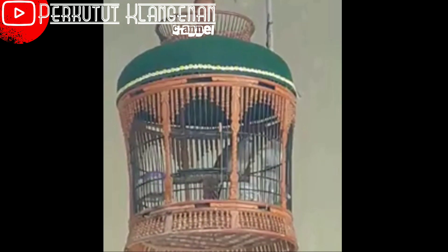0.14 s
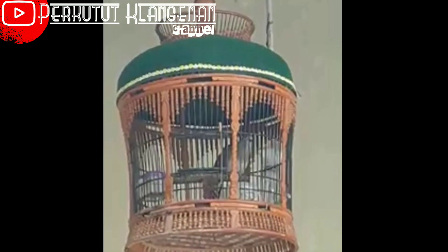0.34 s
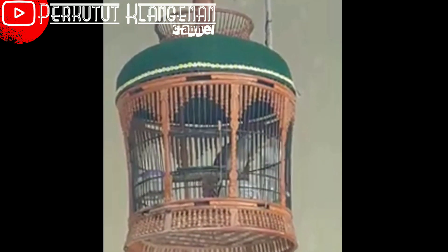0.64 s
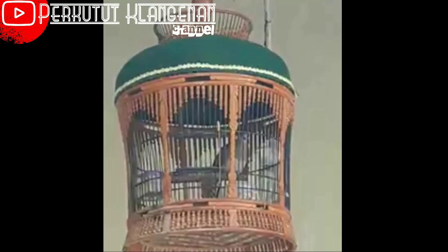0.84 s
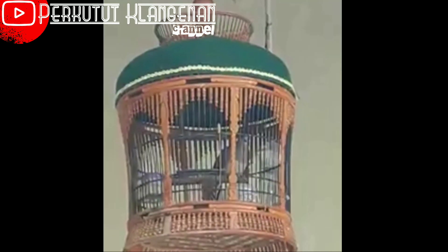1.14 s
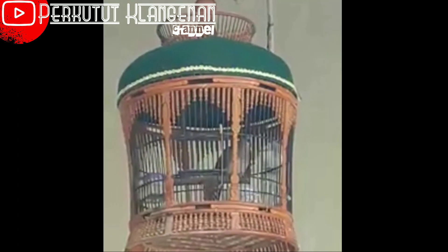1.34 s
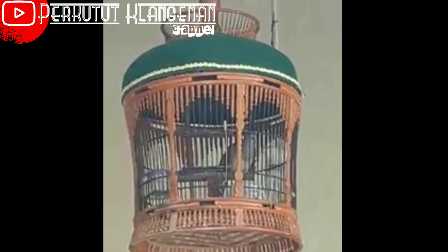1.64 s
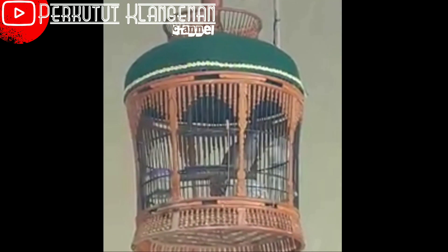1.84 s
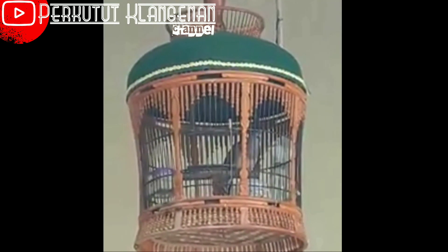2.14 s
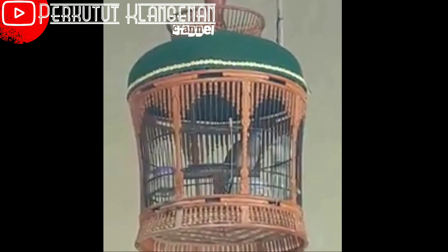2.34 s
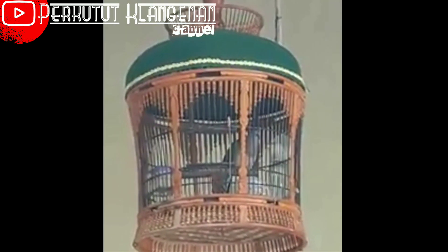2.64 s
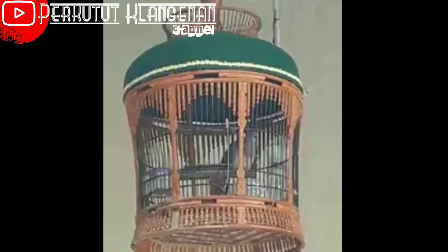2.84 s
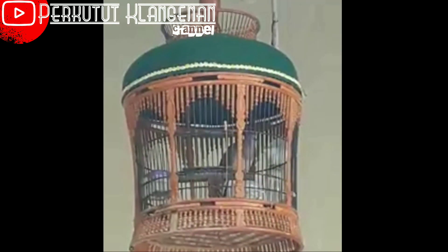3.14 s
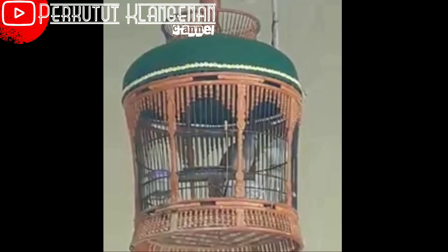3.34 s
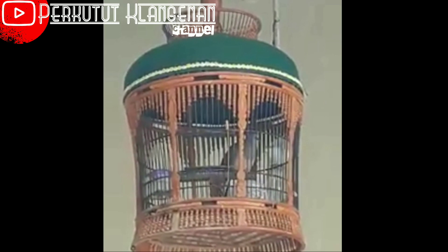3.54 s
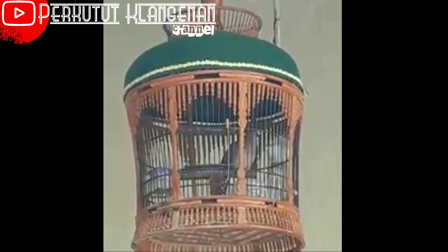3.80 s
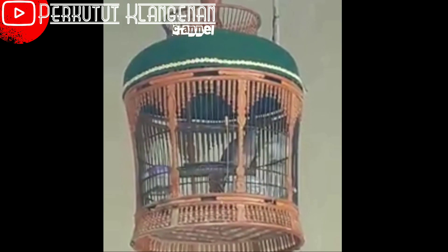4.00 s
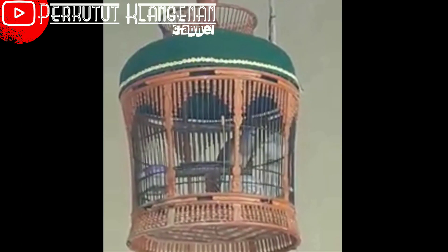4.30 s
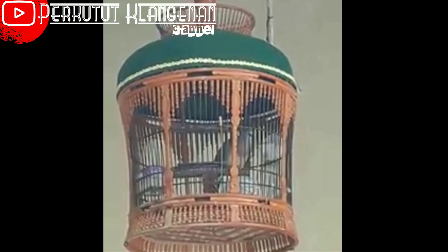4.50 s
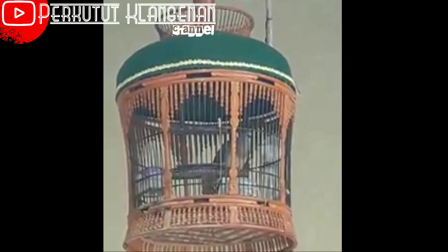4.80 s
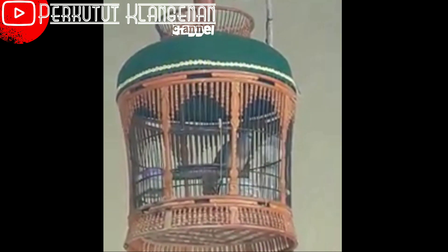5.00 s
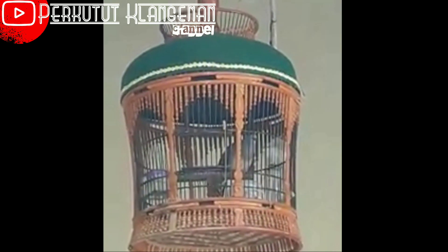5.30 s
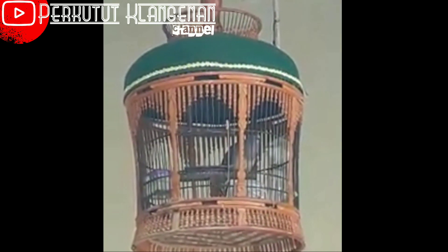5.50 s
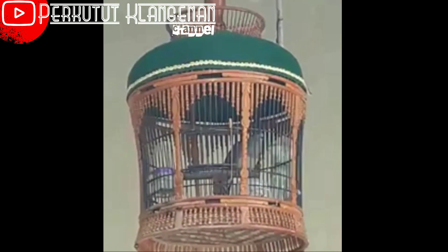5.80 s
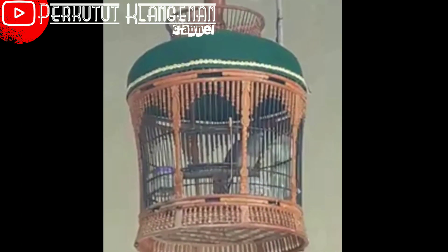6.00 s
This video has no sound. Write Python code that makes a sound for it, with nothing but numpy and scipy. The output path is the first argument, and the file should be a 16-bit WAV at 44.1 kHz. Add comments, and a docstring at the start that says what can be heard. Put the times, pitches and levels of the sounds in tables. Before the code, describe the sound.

In a hard-walled, echoing yard, a quick chirpy whistle sounds close on the right as an earlier coo's echo dies. A nearby caged dove then gives two loud, fluty, throaty coos several seconds apart, overloading the microphone. Faint doves answer far off, soft broom-like swishes come and go over low hum and rumble, and a hoarse fowl calls twice at the end.

```python
"""In a hard-walled yard a caged dove coos loudly; the recorder's input clips on the peaks.
A small bird whistles close to the right microphone, far doves answer, a hoarse fowl calls at the end.
Doves and whistler are gliding sines, the fowl is pulsed noise through a throat; all four get the yard's echo.
A broom-like swish of filtered noise comes and goes over mains hum, distant rumble and low air noise."""
import sys
import numpy as np
from scipy import signal
from scipy.fft import rfft, irfft, next_fast_len
from scipy.io import wavfile
from scipy.ndimage import uniform_filter1d, map_coordinates

SR = 44100
rng = np.random.default_rng(int(sys.argv[2]) if len(sys.argv) > 2 else 0)


def unload_wav(signal):
    """Save mono or channel-first audio to the path in sys.argv[1] as 16-bit WAV at rate SR, clipped to [-1, 1]."""
    wavfile.write(
        sys.argv[1],
        SR,
        np.round(np.clip(np.atleast_2d(signal).T, -1, 1) * 32767).astype(np.int16),
    )


N = 271330
LEAD = SR  # samples made before the start, so that their echo is already there


def amp(db):
    """Decibels to amplitude ratio."""
    return 10 ** (np.asarray(db) / 20)


def unit(x):
    """Scales to rms 1."""
    return x / np.sqrt(np.mean(x ** 2) + 1e-20)


def along(points, hz):
    """Reads (Hz, value) points on a log frequency axis."""
    f, v = np.transpose(points)
    return np.interp(np.log(hz + 1), np.log(f + 1), v)


def curves(rows, t):
    """Each column after the time, read at the times t."""
    s, *cols = np.transpose(rows)
    return [np.interp(t, s, c) for c in cols]


def wobble(knots_per_s, size=N):
    """A smooth random curve through normal knots."""
    knots = rng.standard_normal(int(size * knots_per_s / SR) + 4)
    return map_coordinates(knots, [np.arange(size) * knots_per_s / SR])


def filtered(x, response):
    """x times a complex response of frequency."""
    m = next_fast_len(x.shape[-1] + SR // 2)
    spectrum = rfft(x, m) * response(np.fft.rfftfreq(m, 1 / SR))
    return irfft(spectrum, m)[..., :x.shape[-1]]


def tone(hz):
    """A sine of rms 1 on a pitch curve."""
    return np.sqrt(2) * np.sin(2 * np.pi * np.cumsum(hz) / SR)


def add(track, s, sound):
    """Mixes a sound into a track that begins LEAD samples early."""
    part = track[LEAD + round(s * SR):][:len(sound)]
    part += sound[:len(part)]


# Left-right likeness of noise. Each row: frequency in Hz, correlation from -1 to 1.
LIKENESS = [(60, 1), (150, 0.95), (380, 0.7), (950, 0.1), (2370, -0.0019), (5940, -0.036), (14900, 0.15)]
# Stereo tilt of noise. Each row: frequency in Hz, left minus right in dB.
TILT = [(60, 2), (180, -2), (540, 0.5), (1640, -3), (4950, -5.5), (14900, 2)]


def rush(spectrum, patchy_db):
    """Stereo noise of rms 1: random gain patches in time and frequency, then colour, likeness and tilt."""
    z = signal.stft(rng.standard_normal((2, N)), nperseg=512)[2]
    patches = uniform_filter1d(rng.standard_normal(z.shape[1:]), 6, 0)  # across frequency
    patches = uniform_filter1d(patches, 10, 1)  # across time
    pair = signal.istft(z * amp(patchy_db * unit(patches)), nperseg=512)[1][:, :N]

    def mid_side_gain(hz):
        angle = np.arccos(np.clip(along(LIKENESS, hz), -1, 1)) / 2
        return amp(along(spectrum, hz)) * [np.cos(angle), np.sin(angle)]

    def tilt_gain(hz):
        return amp(np.outer([.5, -.5], along(TILT, hz)))

    mid, side = filtered(pair, mid_side_gain)
    return unit(filtered(np.array([mid + side, mid - side]), tilt_gain))


# Rumble level, before its small wobble. Each row: time in s, level in dB.
RUMBLE_LEVEL = [(0, -53.5), (.6, -49.5), (1.6, -46.5), (2.4, -40.5), (3.4, -43.5), (4.1, -40.5), (5.5, -44),
                (6.15, -42)]


def rumble_level():
    """Rumble level in dB against time; hum and air follow its swings in part."""
    return curves(RUMBLE_LEVEL, np.arange(N) / SR)[0]


# Rumble colour. Each row: frequency in Hz, relative density in dB per Hz.
RUMBLE_COLOUR = [(15, -38.5), (25, -29), (38, -37.5), (89, 1.5), (151, -3), (266, -9.5), (300, -8.5),
                 (430, -12.5), (537, -12), (1500, -13), (1950, -66), (3300, -120)]


def distant_rumble(level_db):
    """Low patchy noise, strongest near 90 Hz, whose level drifts."""
    return amp(level_db + 0.8 * wobble(3)) * rush(RUMBLE_COLOUR, patchy_db=2.0)


# Mains lines. Each row: centre frequency in Hz, nominal level in dB.
MAINS_LINES = [(100, -54), (150, -53.5), (200, -60.5), (300, -51.5), (400, -59.5)]


def mains_hum(swing_db):
    """Mains harmonics as sines, slightly unsteady in level and pitch."""
    hum = np.zeros(N)
    for hz, db in MAINS_LINES:
        level_db = db + 2.1 * wobble(4.9) + 0.96 * swing_db
        hum += amp(level_db) * tone(hz + 1.5 * wobble(10))
    return hum


def port_air(swing_db):
    """Air on the microphone ports: noise falling steeply above 35 Hz, independent left and right."""
    noise = filtered(rng.standard_normal((2, N)), lambda hz: 1 / (1 + (hz / 35) ** 3))
    return amp(-59 + .6 * swing_db) * unit(noise)


def stroke(t, hold_s):
    """Gain of one sweep: quick rise, hold, fade."""
    rise_s, fall_db_per_s = 0.045, 63
    fade_db = -fall_db_per_s * np.clip(t - rise_s - hold_s, 0, None)
    return np.clip(t / rise_s, 0, 1) ** 2 * amp(fade_db)


# Strokes. Each row: body start in s, hiss lead in s, body hold in s, relative body dB, relative hiss dB.
STROKES = [(1.19, .08, 0.097, -40.5, -63.5), (2.425, .03, 0.094, -56, -56.5),
           (3.655, 0.04, 0.21, -46.5, -67), (4.987, .02, 0.059, -44, -60)]
# Continuous noise under the strokes, rising and falling, at times as loud as they are.
# Each row: time in s, relative body level in dB, relative hiss level in dB.
STEADY_WASH = [(0, -49.5, -63), (1.05, -58.5, -68.5), (1.6, -65, -69), (1.85, -48.5, -60.5),
               (2.3, -48.5, -63.5), (3, -55, -66.5), (3.6, -51, -63), (4.3, -45.5, -56), (4.9, -49, -63.5),
               (5.6, -55.5, -66), (6.15, -47, -59.5)]
# Body colour. Each row: frequency in Hz, relative density in dB per Hz.
BODY_COLOUR = [(700, -48), (1200, -17), (1700, 2.5), (2800, 0.5), (3500, -11), (4700, -7), (7000, -51),
               (10000, -52.5)]
# Hiss colour. Each row: frequency in Hz, relative density in dB per Hz.
HISS_COLOUR = [(2500, -5), (4000, -1), (6000, -2), (8200, -6), (10000, -6.5), (13000, -5.5), (15500, -9.5)]


def swish():
    """Broom-like strokes on a continuous wash of like noise; each stroke's hiss leads its body a little."""
    t = np.arange(N) / SR
    body_db, hiss_db = curves(STEADY_WASH, t)
    body_gain, hiss_gain = amp(body_db), amp(hiss_db)
    for s, lead_s, hold_s, stroke_body_db, stroke_hiss_db in STROKES:
        body_gain += amp(stroke_body_db) * stroke(t - s, hold_s)
        hiss_gain += amp(stroke_hiss_db) * stroke(t - s + lead_s, hold_s + lead_s)
    body = body_gain * amp(4.5 + 0.89 * wobble(14)) * rush(BODY_COLOUR, patchy_db=2.5)
    hiss = hiss_gain * amp(14 + .8 * wobble(9)) * rush(HISS_COLOUR, patchy_db=3.5)
    return body + hiss


def background():
    """Sum of swish, rumble, hum and air; no yard echo is added."""
    level_db = rumble_level()
    swing_db = level_db - level_db.mean()
    return swish() + distant_rumble(level_db) + mains_hum(swing_db) + port_air(swing_db)


# Echo decay before evening and the ageing fade. Each row: frequency in Hz, t60 in s.
YARD_T60 = [(500, 0.32), (1000, 0.63), (2500, 0.86), (6000, 0.54)]


def yard(x, direct_db, rise_s, left_lag_s):
    """Direct sound, later on the left, plus a noise echo that builds up and dies at a speed set by pitch."""
    hz, t, z = signal.stft(rng.standard_normal((2, LEAD)), SR, nperseg=256)
    decay = amp(-60 * t / along(YARD_T60, hz)[:, None])
    tail = signal.istft(z * decay, SR, nperseg=256)[1][:, :LEAD]
    spectrum = rfft(tail, 2 * LEAD)
    # evens out the noise tail's spectrum, so that steady tones keep a more equal echo level
    tail = irfft(spectrum / np.sqrt(np.abs(spectrum)))[:, :LEAD]
    age_s = np.arange(LEAD) / SR
    ageing_fade = amp(-20 * age_s ** 2)  # the echo dies faster and faster as it ages
    tail = tail * (1 - np.exp(-age_s / rise_s)) * ageing_fade
    tail = tail / np.linalg.norm(tail, axis=1, keepdims=True)
    direct = amp(direct_db)[:, None] * [np.roll(x, round(left_lag_s * SR)), x]
    echo = signal.fftconvolve(x[None], tail, axes=1)[:, :len(x)]
    return (echo + direct)[:, LEAD:]


# Far notes. Each row: start in s, length in s, nominal first Hz, nominal last Hz, relative level in dB,
# burr as pitch scatter share.
FAR_NOTES = [(0.361, 0.093, 734, 727, -46, 0.0323), (0.935, 0.082, 740, 763, -52, 0.05),
             (1.413, 0.23, 818, 794, -52, 0.043), (2.672, 0.075, 855, 732, -43.5, 0.054),
             (2.919, 0.066, 916, 810, -48, .07), (3.221, 0.125, 780, 712, -46.5, 0.057),
             (3.422, 0.32, 945, 925, -49.5, 0.018), (3.451, 0.46, 811, 860, -50.5, 0.048),
             (3.776, 0.28, 948, 885, -48, 0.0064), (4.062, 0.074, 926, 866, -44.5, 0.018),
             (5.045, 0.128, 669, 732, -48.5, 0.041), (5.192, 0.061, 879, 714, -34, 0.039),
             (5.879, 0.0844, 962, 1034, -20.5, 0.017), (6.138, 0.051, 990, 928, -22.5, 0.012)]


def far_doves():
    """Short burry sines that start abruptly, slightly flat, and throb with the burr."""
    track = np.zeros(LEAD + N)
    for s, length_s, first_hz, last_hz, db, burr in FAR_NOTES:
        t = np.arange(round(length_s * SR)) / SR
        glide_hz = first_hz + (last_hz - first_hz) * t / length_s
        hz = glide_hz * (1 - 0.04 * np.exp(-t / 0.019))
        swell = np.clip(np.minimum(t / 0.0013, (length_s - t) / 0.024), 0, 1)
        throb = 1 + 12 * burr * np.sin(2 * np.pi * 60 * t)
        scatter = 1 + burr * wobble(91.1, size=len(t))
        add(track, s, amp(db) * swell * throb * tone(hz * scatter))
    return track


# Throat resonances, passed twice. Each row: centre in Hz, width in Hz, relative level per pass in dB.
THROAT = [(730, 430, -4), (1120, 300, -0.5), (1550, 200, 2), (2111.7, 670, -7), (2930, 800, -10.5)]
# Fowl calls. Each row: time of full strength in s, hold in s, relative level in dB.
FOWL_CALLS = [(5.828, 0.057, -24.5), (6.133, .03, -20)]


def fowl():
    """Breathy noise gated by uneven slow pulses, through the throat; each call swells fast and fades."""
    rise_db_per_s, fall_db_per_s = 394, 194
    t = np.arange(-LEAD, N) / SR
    pulse_hz = 65 + 12 * wobble(20, size=len(t))
    gate = (1 + 0.16 * np.sin(2 * np.pi * np.cumsum(pulse_hz) / SR)) ** 2

    def throat(f):
        total = 0
        for k, (centre, width, db) in enumerate(THROAT):
            band = 1j * f * width / (centre * centre - f * f + 1j * f * width + 1)
            total = total + (-1) ** k * amp(db) * band  # alternate signs
        return total

    voice = unit(filtered(gate * rng.standard_normal(len(t)), lambda f: throat(f) ** 2))
    gain = np.zeros(len(t))
    for s, hold_s, db in FOWL_CALLS:
        slope_db = np.minimum(rise_db_per_s * (t - s), fall_db_per_s * (s + hold_s - t))
        gain += amp(db + np.minimum(0, slope_db))
    return voice * gain


# Three notes: an arch, a rise with a final drop, a fall. Each row: time in s, pitch in Hz, relative dB.
WHISTLE_NOTES = [
    [(.022, 1950, -36), (.033, 2650, -11), (.046, 3170, -11), (.056, 2904, -9.5), (.062, 2130, -11),
     (.068, 1990, -27)],
    [(.083, 2690, -28), (.094, 2632, -12), (.115, 2570, -6), (.164, 3070, -11), (.177, 3236, -21),
     (.19, 2630, -21)],
    [(.195, 2680, -23.5), (.203, 2680, -12.5), (.226, 2570, -5.5), (.242, 2212, -13.5), (.246, 1990, -28)],
]
# Level roughness of each note, 0-1.
NOTE_RASP = [0.13, 0.014, .02]
# Echoes near the whistler. Each row: delay in s, level against the notes in dB.
WALL_ECHOES = [(.0045, -25), (.009, -18), (0.013, -13.5), (0.018, -20.5), (0.024, -20.5)]


def whistler():
    """Gliding sines, the first one raspy, with quick echoes off nearby walls."""
    glide_s = 0.0042  # rounds the corners of the pitch
    track = np.zeros(LEAD + N)
    for note, rasp in zip(WHISTLE_NOTES, NOTE_RASP):
        t = np.arange(note[0][0], note[-1][0], 1 / SR)
        hz, db = curves(note, t)
        hz = uniform_filter1d(hz, round(glide_s * SR), mode='nearest')
        edge = np.clip(np.minimum(t - t[0], t[-1] - t) / 0.0011, 0, 1)
        roughness = 1 + rasp * wobble(2500, size=len(t))
        add(track, t[0], amp(db) * edge * roughness * tone(hz))
    echoes = sum(amp(db) * np.roll(track, round(s * SR)) for s, db in WALL_ECHOES)
    return track + echoes


# One coo: scoop up, held top, sag, second lift and sag. Each row: s after its start, nominal pitch in Hz,
# relative level in dB, depth of the throat roll 0-1.
COO_SHAPE = [(0, 864, -46.5, .1), (.022, 895.3, -4.5, 0), (.048, 1125, -1, 0.39), (.15, 1131, -2, 0.32),
             (.25, 1008, -5, 0.07), (.4, 981.8, -6, 1), (.435, 1095, -1.5, 0.56), (.565, 986.6, -9.5, 1),
             (.59, 926, -51, 0.4)]
# Coos. Each row: start in s, relative level in dB, puff level within the coo in dB.
COO_STARTS = [(-.565, -6, -22), (1.675, -2, -20), (4.204, -0.5, -15.5)]
# Breath colour. Each row: frequency in Hz, relative density in dB per Hz.
BREATH_COLOUR = [(450, -29.5), (700, -14), (950, 20.5), (1150, -10), (1400, -12), (1700, -45),
                 (2400, -44.5)]


def dove():
    """An almost pure tone from the swollen crop, some breath, an opening puff; a throat flutter rolls it."""
    breath_db = -14.5  # against the tone
    puff_rise_s, puff_fade_s, puff_hz, puff_half_width_hz = 0.0027, 0.037, 1128, 453
    track = np.zeros(LEAD + N)
    t = np.arange(round(COO_SHAPE[-1][0] * SR)) / SR
    hz, level_db, roll = curves(COO_SHAPE, t)
    puff_gain = (1 - np.exp(-t / puff_rise_s)) ** 2 * np.exp(-t / puff_fade_s)

    def puff_band(f):
        return 1 / (1 + ((f - puff_hz) / puff_half_width_hz) ** 4)

    for s, db, puff_db in COO_STARTS:
        flutter_hz = 40 + 5 * wobble(15.27, size=len(t))
        flutter = np.sin(2 * np.pi * np.cumsum(flutter_hz) / SR)
        waver = 1 + 0.0039 * wobble(60.32, size=len(t))
        breath = unit(filtered(rng.standard_normal(len(t)), lambda f: amp(along(BREATH_COLOUR, f))))
        puff = puff_gain * unit(filtered(rng.standard_normal(len(t)), puff_band))
        voice = amp(level_db) * (tone(hz * waver) + amp(breath_db) * breath) + amp(puff_db) * puff
        add(track, s, amp(db) * (1 + np.clip(roll, 0, 1) * flutter) * voice)
    return track


def scene():
    """Background plus four voices in the yard, each with its left and right gains in dB."""
    far = amp([[-1.5], [1.5]]) * yard(far_doves(), direct_db=[-1, 0], rise_s=0.066, left_lag_s=.0001)
    hoarse = amp([[-2.5], [1.5]]) * yard(fowl(), direct_db=[-3, -3], rise_s=0.0033, left_lag_s=.0002)
    close = amp([[-36], [-24]]) * yard(whistler(), direct_db=[14, 33], rise_s=0.0075, left_lag_s=.0003)
    near = amp([[-2.5], [-1]]) * yard(dove(), direct_db=[-4, -4], rise_s=0.018, left_lag_s=0.00026)
    return background() + far + hoarse + close + near


def record(dry):
    """The input clips hard just under full scale; a band limit then removes the top."""
    top_hz = 15500
    clipped = np.clip(dry, -.99, .99)
    return np.clip(filtered(clipped, lambda hz: hz < top_hz), -1, 1)


dry = scene()
out = record(dry)
unload_wav(out)
```